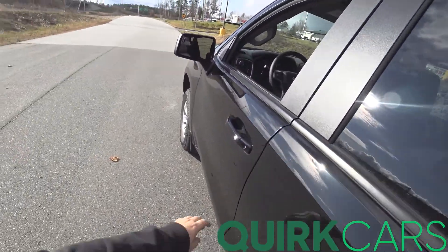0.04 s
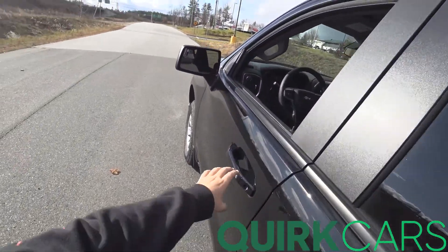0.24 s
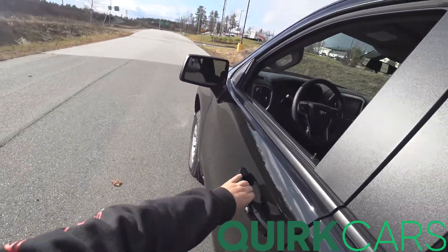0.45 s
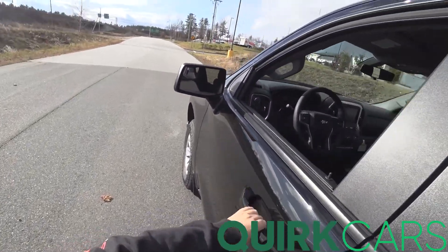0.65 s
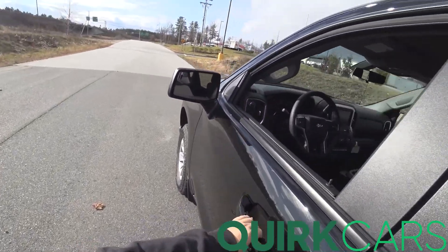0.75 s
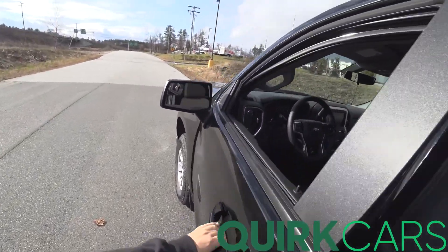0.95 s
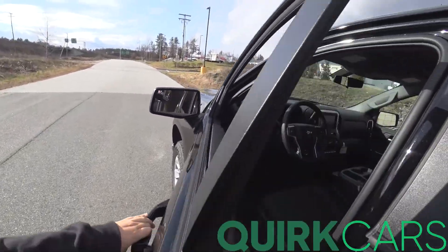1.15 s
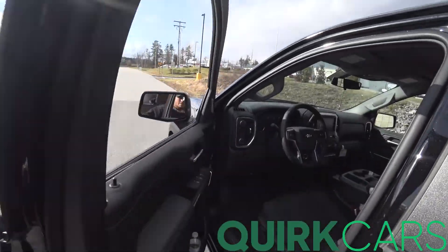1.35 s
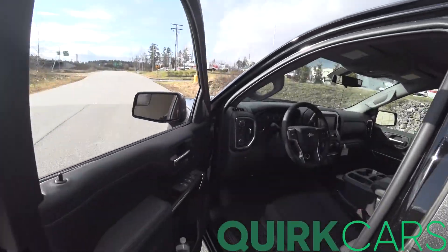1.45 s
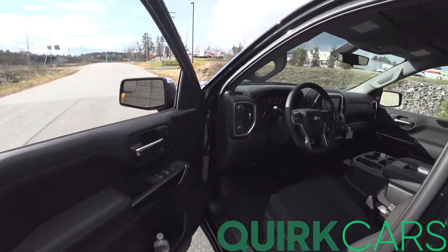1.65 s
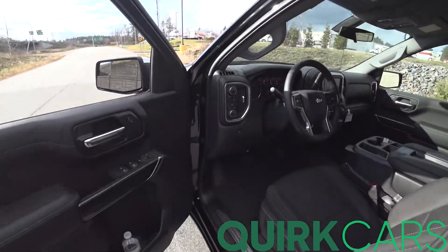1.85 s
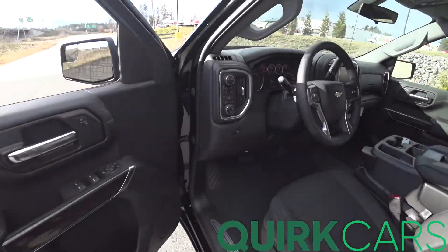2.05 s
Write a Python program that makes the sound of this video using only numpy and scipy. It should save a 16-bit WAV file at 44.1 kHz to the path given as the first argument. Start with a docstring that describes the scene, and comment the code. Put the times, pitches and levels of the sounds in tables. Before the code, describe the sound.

Vehicle door handle clunks and latch snaps open outdoors, hinge knocks, then heavy wind rumble

```python
"""On an open road, a pickup's door is opened close to a hand-held camera.
A sleeve rustles (coloured noise), the handle thuds on its stop and the latch snaps (ringing metal and noise bursts).
The door swishes out, and its hinge stay scrapes and knocks. Wind rumbles on the microphone and buffets its
two ports (noise and short pressure swings), hard once the door is open. Air, hiss and a low hum lie under it all."""
import sys
import numpy as np
from scipy import signal
from scipy.fft import rfft, irfft, next_fast_len
from scipy.io import wavfile
from scipy.ndimage import map_coordinates

SR = 44100
rng = np.random.default_rng(int(sys.argv[2]) if len(sys.argv) > 2 else 0)


def generate_wav(sig):
    """Save sig (samples, or channels by samples) to the path in sys.argv[1] as 16-bit PCM at SR."""
    pcm = np.round(np.clip(np.atleast_2d(sig).T, -1, 1) * 32767).astype(np.int16)
    wavfile.write(sys.argv[1], SR, pcm)


N = 92477  # length in samples, about 2.1 s

# Slow wind pressure on the ports: time_s, level_db
RUMBLE_LEVEL = [(0, -19), (.05, -45), (.08, -26.5), (.15, -40.5), (.2, -29.5), (.245, -40.5), (.3, -31),
                (.46, -37), (.74, -40), (.81, -27.5), (.92, -39), (1.4, -33.5), (1.47, -22), (1.53, -32.5),
                (1.61, -19), (1.69, -24), (2.09, -24.5)]
# Its tone: pitch_hz, level_db
RUMBLE_COLOUR = [(12, -28), (28, 2), (60, -6.5), (100, -9), (200, -17.5), (500, -78), (1500, -90)]
# Turbulence between the ports: time_s, level_db
BUFFET_LEVEL = [(0, -24.5), (.05, -41), (.085, -23), (.12, -45), (.29, -40), (.42, -50), (1.0, -76),
                (1.43, -42), (1.455, -24), (1.49, -27.5), (1.58, -27), (1.73, -22.5), (1.8, -26.5),
                (1.88, -28), (1.925, -24), (1.95, -33), (1.975, -20), (2.02, -24), (2.09, -26)]
# Tone of the part that pushes the ports opposite ways: pitch_hz, level_db
OPPOSED_COLOUR = [(25, -39), (60, 1), (115, 13), (200, 4), (400, -4), (600, -15), (1300, -29), (2400, -36),
                  (6000, -84)]
# Tone of the part both ports share: pitch_hz, level_db
SHARED_COLOUR = [(25, 5), (60, -9), (120, -0.5), (200, -3.5), (300, -7), (420, -16.5), (900, -32),
                 (2400, -36), (6000, -96)]
RUMBLE_SIDE_DB, BUFFET_MID_DB = -11.5, -6.5

# Rush of outdoor air, before a 1 dB lift and random wavering: time_s, level_db
AIR_LEVEL = [(0.0, -40.5), (0.33, -43), (0.71, -37.5), (0.95, -39.5), (1.41, -38.5), (1.62, -37.5),
             (2.09, -40)]
# Its tone: pitch_hz, level_db
AIR_COLOUR = [(40, -5), (150, -1.5), (290, -4), (420, -6.5), (620, -5.5), (860, -6), (1250, -15),
              (1500, -13.5), (1780, -11), (2020, -22.5), (2500, -31), (3500, -27), (8000, -99)]
# Fine hiss, before a 6.5 dB lift: time_s, level_db
HISS_LEVEL = [(0.0, -54), (0.22, -58.5), (0.81, -57.5), (1.27, -55), (1.47, -50), (1.61, -51.5),
              (1.74, -53), (2.09, -53)]
# Its tone: pitch_hz, level_db
HISS_COLOUR = [(1000, 7), (2500, 4), (4000, -2), (6000, 1.5), (8000, -2), (11000, -2.5), (13500, -6.5),
               (15500, -1)]
AIR_SIDE_DB, HISS_SIDE_DB = -13.5, -11
HUM_HZ, HUM_DB = 72.6, -43  # middle values; both waver a little

# Single eddies striking the ports:
# middle_s, length_s, opposed_level_db, opposed_pitch_hz, shared_level_db, shared_pitch_hz
EDDIES = [(0.076, 0.0055, -26, 150, -21, 105), (0.083, 0.0012, -6, 324, -12.5, 260),
          (0.0982, 0.0028, -11, 416, -19, 428), (.095, .005, -24, 222, -18.5, 182),
          (.296, 0.0019, -23, 250, -31, 181), (1.456, 0.0066, -15, 208, -18.5, 159),
          (1.468, .004, -17, 300, -23.5, 320), (1.526, 0.005, -19, 219, -29, 161),
          (1.554, 0.0029, -16, 328, -20.5, 228), (1.604, 0.0024, -12.5, 152, -12, 100),
          (1.616, 0.002, -6.5, 500, -16.5, 314), (1.642, 0.0029, -8.5, 241, -19, 159),
          (1.678, 0.0019, 0.5, 293, -14, 260), (1.708, 0.0048, -9, 169, -17.5, 150),
          (1.726, 0.0059, -9.5, 312, -14, 196), (1.74, 0.001, -13, 430, -16.5, 324),
          (1.758, 0.0025, -7, 210, -20, 139), (1.769, 0.0018, -5.5, 250, -17, 220),
          (1.811, 0.0026, -17, 310, -35, 150), (1.830, .005, -10, 198, -24, 151),
          (1.844, 0.0021, -4.5, 170, -16.5, 183), (1.8576, 0.0033, -4, 426, -10.5, 187.4),
          (1.871, 0.0051, -11.5, 480, -19.5, 313), (1.886, 0.0032, -2, 208, -17.5, 179),
          (1.897, 0.0018, -12, 470, -21.5, 298), (1.91, 0.0007, -5, 450, -18, 333),
          (1.9203, 0.00098, -5, 456, -15, 261), (1.93, 0.0045, -5.5, 143, -20, 106),
          (1.969, 0.004, -15, 260, -33, 164), (1.997, 0.0013, -11, 230, -32, 160),
          (2.061, .0015, -11, 413, -20.5, 306), (2.071, .008, -19, 272, -23.5, 131)]
# Tone of an eddy's fraying: multiple_of_pitch, level_db
FRAY_COLOUR = [(.2, 0.5), (.6, 6), (1, -3.5), (1.7, 2), (3, -20.5), (6, -43), (20, -70)]
EDDY_FRAY_DB = -5.5
EDDY_GLIDE = 0.14  # typical random pitch shift at the ends of an eddy, as a share of its pitch

# Some eddies pop on the microphone: start_s, level_db
POPS = [(.0815, -27), (.0965, -39), (1.613, -26), (1.6765, -15), (1.8588, -16), (1.9075, -27),
        (1.92, -23.5), (2.059, -35)]
# Tone of their dull crack: pitch_hz, level_db
POP_COLOUR = [(300, 4.5), (900, -2), (1400, -1), (2200, -12), (4800, -26.5), (6500, -27), (15000, -48)]
POP_HZ, POP_T60_S, POP_PUSH_DB = 800, 0.0071, 5.5  # push level is added to each pop's own

# Sleeve strokes of the reaching arm, before random wavering: time_s, level_db
SLEEVE_LEVEL = [(.1, -60), (.18, -43.5), (.33, -42.5), (.48, -40), (.54, -49.5), (.66, -62), (.73, -42),
                (.8, -46), (.86, -60)]
# Tone of the strokes: pitch_hz, level_db
SLEEVE_COLOUR = [(300, -8), (1300, 6.5), (2500, -5.5), (4000, -10.5), (6800, -13), (8200, -23),
                 (15000, -37)]
# Soft swish of arm and door swinging out, before random wavering: time_s, level_db
SWING_LEVEL = [(.88, -55), (.97, -44.5), (1.13, -41), (1.27, -45), (1.34, -70), (1.4, -70)]
# Tone of the swish: pitch_hz, level_db
SWING_COLOUR = [(400, -28), (850, 4), (1100, -3), (1500, -2.5), (1900, -16), (2350, -4), (3000, -19),
                (8000, -33)]

# The handle meeting its stop: start_s, level_db
THUDS = [(0.7714, -13.5), (0.7852, -21), (.801, -20), (.83, -31), (.846, -29), (.864, -32.5)]
# Ringing tones of the door skin: pitch_hz, level_db, decay_by_60_db_s
PANEL_MODES = [(72.5, -12, 0.25), (122, -1, .1), (196, -5, 0.067), (274, 4.5, 0.054), (358, -5, 0.1),
               (488, -7, 0.062)]
THUD_ATTACK_S = 0.00098
LATCH_S, LATCH_DB = 0.7970, -12.5  # the latch lets go
# Ringing tones of the latch: pitch_hz, level_db, decay_by_60_db_s
LATCH_MODES = [(370, -3, 0.021), (480, 3.5, 0.034), (610, -9, 0.028), (792, -11.5, 0.074), (900, -8, 0.044),
               (1065, -8.5, 0.031), (1880, -14.5, 0.032), (2120, -12.5, 0.033), (3530, -16.5, 0.034),
               (4850, -29, 0.038), (8420, -19.5, 0.021)]
# Tone of the latch's snap: pitch_hz, level_db
SNAP_COLOUR = [(300, 4), (1000, 7), (1400, -5), (2000, 0), (4500, 1), (7000, -5.5), (10500, -2.5),
               (13000, -13), (16000, -20)]
RELEASE_DB, RELEASE_HZ, RELEASE_T60_S = -9.5, 452, 0.0069  # the seal shoves the freed door out
PAWL_S, PAWL_DB = 0.8239, -39  # the pawl springs back with a brief steel ring
# Ringing tones of the pawl: pitch_hz, level_db, decay_by_60_db_s
PAWL_MODES = [(3560, -3, 0.032), (3900, -4, .035), (4430, -4, .04), (4910, -1, .055), (5490, -7, 0.038),
              (5870, 0, 0.039)]
# Small clicks of the handle and linkage: start_s, level_db
TICKS = [(0.574, -35), (.587, -32.5), (.8239, -20.5), (.85, -32), (.8962, -29)]
# Tone of the clicks: pitch_hz, level_db
TICK_COLOUR = [(1000, 8), (2800, -4), (3800, 2), (5500, 4), (7500, -1.5), (11000, -2), (15500, -15)]

# The hinge stay scraping up to and past its notch: start_s, level_db
SCRAPES = [(1.372, -32), (1.3882, -23), (1.3928, -18.5), (1.3985, -26)]
# Tone of the scrapes: pitch_hz, level_db
SCRAPE_COLOUR = [(150, 4.5), (550, 14), (900, 9), (1300, 0.5), (2500, 0), (3600, -6), (6500, -10.5),
                 (10500, -17), (14000, -24)]
SCRAPE_T60_S, SCRAPE_GRIT_DB = 0.036, 2.5
NOTCH_S, NOTCH_DB = 1.3935, -11.5  # the stay drops over the notch and knocks the door
# Ringing tones of that knock: pitch_hz, level_db, decay_by_60_db_s
STAY_MODES = [(345, -12, 0.087), (463, 1.5, 0.058), (583, -2.5, 0.047), (652, -4, 0.039), (797, -12, 0.034),
              (907, -11, 0.062), (1070, -9, 0.06), (1580, -29, 0.068), (1810, -16, .06), (2310, -21, 0.044),
              (2530, -16, 0.05)]

# Tone of the reflections: pitch_hz, level_db
REFLECTION_COLOUR = [(100, 3.5), (600, 4), (1200, 0.5), (2500, 0.5), (4500, 1), (15000, 2)]
DOOR_WET_DB, DOOR_T60_S = -11.5, 0.06
LATCH_LEFT_DB, STAY_LEFT_DB, SLEEVE_LEFT_DB = -0.5, 1.6, 1.24  # below zero leans right
CLIP_TOP, TOP_HZ = 1.1, 16000  # ceiling of the overload (full scale is 1), band limit


def amp(db):
    """Turn decibels into a gain."""
    return 10 ** (np.asarray(db) / 20)


def unit(x):
    """Scale to an average (rms) strength of 1."""
    return x / np.sqrt(np.mean(x ** 2) + 1e-20)


def curve(rows):
    """Join (time, value) points with straight lines, one value per sample."""
    return np.interp(np.arange(N) / SR, *np.transpose(rows))


def wobble(rate):
    """Draw a smooth random curve through this many random points a second."""
    points = rng.standard_normal(int(N * rate / SR) + 4)
    return map_coordinates(points, [np.arange(N) * rate / SR])


def gain(points, hz):
    """Read a gain off (pitch, level) points, spaced by ratio of pitch as the ear hears it."""
    pitch_hz, level_db = np.transpose(points)
    return amp(np.interp(np.log(hz + 1), np.log(pitch_hz + 1), level_db))


def noise(colour, size=N):
    """Shape random noise to a tone colour, at rms 1."""
    padded = next_fast_len(size + 2048)
    spectrum = rfft(rng.standard_normal(padded))
    spectrum = spectrum * gain(colour, np.fft.rfftfreq(padded, 1 / SR))
    return unit(irfft(spectrum, padded)[:size])


def stereo(mid, side):
    """Build left and right from a shared part and an opposed part."""
    return np.array([mid + side, mid - side])


def rush(colour, side_db):
    """Make stereo noise; a stronger opposed part sounds wider."""
    return stereo(noise(colour), amp(side_db) * noise(colour))


def place(x, left_db):
    """Lean a sound left by raising the left side and lowering the right equally."""
    return x * amp([[left_db], [-left_db]])


def add(track, s, sound):
    """Mix a sound into the track at a time in seconds."""
    first = max(round(s * SR), 0)
    track[..., first:first + sound.shape[-1]] += sound[..., :max(N - first, 0)]


def fade(t, t60):
    """Die away smoothly, dropping 60 dB in t60 seconds."""
    return np.exp(-np.log(1000) * t / t60)


def ring(modes, attack_s, hard=True):
    """Ring fading tones from one blow: in step if hard, alternately opposed if soft."""
    t = np.arange(SR // 4) / SR
    sign = 1 if hard else -1
    tones = np.zeros(len(t))
    for k, (hz, db, t60) in enumerate(modes):
        strength = amp(db + rng.normal(0, 1))  # each blow excites the tones a little differently
        tones += strength * fade(t, t60) * np.sin(2 * np.pi * hz * t) * sign ** k
    return tones * (1 - np.exp(-t / attack_s))


def crack(colour, t60, tail_db, tail_t60):
    """Make a hard contact: a short noise burst with a weaker, longer rattle."""
    size = 8192
    t = np.arange(size) / SR
    envelope = fade(t, t60) + amp(tail_db) * fade(t, tail_t60)
    burst = rng.standard_normal(size) * envelope
    # Fold the log spectrum into a filter that never sounds before the blow
    shape = unit(gain(colour, np.fft.rfftfreq(size, 1 / SR)))
    cepstrum = irfft(np.log(shape))
    causal = np.r_[cepstrum[0], 2 * cepstrum[1:size // 2]]
    return irfft(rfft(burst) * np.exp(rfft(causal, size)))


def wind():
    """Slow pressure rumbles in both ports; lumpy turbulence pushes them mostly opposite ways."""
    rumble = amp(curve(RUMBLE_LEVEL)) * rush(RUMBLE_COLOUR, RUMBLE_SIDE_DB)
    lumps = unit(amp(3.2 * wobble(55)))
    buffet = stereo(amp(BUFFET_MID_DB) * noise(SHARED_COLOUR), noise(OPPOSED_COLOUR))
    return rumble + amp(curve(BUFFET_LEVEL)) * lumps * buffet


def outdoors():
    """Moving air makes a broad rush and fine hiss, over a low wavering hum."""
    air_db = curve(AIR_LEVEL) + 1.0 + 1.5 * wobble(11.72)
    air = amp(air_db) * rush(AIR_COLOUR, AIR_SIDE_DB)
    hiss = amp(curve(HISS_LEVEL) + 6.5) * rush(HISS_COLOUR, HISS_SIDE_DB)
    hum_gain = amp(HUM_DB + 0.74 * wobble(7.3)) * np.sqrt(2)  # a sine's peak is root 2 times its rms
    hum_phase = 2 * np.pi * HUM_HZ * np.arange(N) / SR + 0.15 * wobble(5.9)
    return air + hiss + hum_gain * np.sin(hum_phase)


def swirl(t, hz, length):
    """One pressure swing speeds up or slows down and frays into turbulence."""
    fray = noise([(hz * multiple, db) for multiple, db in FRAY_COLOUR], size=len(t))
    bend = EDDY_GLIDE * rng.normal() * length * np.log(np.cosh(t / length))
    swing = np.sin(2 * np.pi * (hz * (t + bend) + rng.random()))
    return swing + amp(EDDY_FRAY_DB) * fray


def eddies():
    """Each eddy briefly swings the pressure, partly between the ports and partly in both."""
    out = np.zeros((2, N))
    t = np.arange(-SR // 20, SR // 20) / SR
    for s, length, opposed_db, opposed_hz, shared_db, shared_hz in EDDIES:
        shared = amp(shared_db) * swirl(t, shared_hz, length)
        opposed = amp(opposed_db) * swirl(t, opposed_hz, length)
        swell = 1 / np.cosh(t / length)
        add(out, s + t[0], stereo(shared, opposed) * swell)
    return out


def pops():
    """Some eddies give a sudden push of air and a short dull crack."""
    out = np.zeros(N)
    for s, db in POPS:
        add(out, s, amp(db) * ring([(POP_HZ, POP_PUSH_DB, POP_T60_S)], attack_s=0.00033))
        add(out, s, amp(db - 6.5) * crack(POP_COLOUR, POP_T60_S, tail_db=-19, tail_t60=0.054))
    return out


def sleeve():
    """Cloth rubs as the arm reaches for the handle, then swishes as the door swings out."""
    reach_db = curve(SLEEVE_LEVEL) + 0.93 * wobble(59.7)
    reach = amp(reach_db) * rush(SLEEVE_COLOUR, side_db=-10.0)
    swing_db = curve(SWING_LEVEL) + 2.2 * wobble(41.2)
    swing = amp(swing_db) * rush(SWING_COLOUR, side_db=-9)
    return place(reach + swing, SLEEVE_LEFT_DB)


def handle_and_latch():
    """The handle thuds into the door skin, the latch snaps, the seal shoves and the linkage ticks."""
    out = np.zeros(N)
    for s, db in THUDS:
        add(out, s, amp(db) * ring(PANEL_MODES, THUD_ATTACK_S, hard=False))
    add(out, LATCH_S, amp(LATCH_DB) * ring(LATCH_MODES, attack_s=0.00029))
    add(out, LATCH_S, ring([(RELEASE_HZ, RELEASE_DB, RELEASE_T60_S)], attack_s=0.00039))
    add(out, LATCH_S, amp(-16.5) * crack(SNAP_COLOUR, t60=0.0046, tail_db=-16, tail_t60=0.11))
    add(out, PAWL_S, amp(PAWL_DB) * ring(PAWL_MODES, attack_s=0.0001))
    for s, db in TICKS:
        add(out, s, amp(db) * crack(TICK_COLOUR, t60=0.0029, tail_db=-17.5, tail_t60=0.077))
    return out


def hinge_stay():
    """The stay scrapes grittily up to and past its notch, knocking the door as it drops over."""
    out = np.zeros(N)
    for s, db in SCRAPES:
        scrape = crack(SCRAPE_COLOUR, SCRAPE_T60_S, tail_db=-12, tail_t60=0.12)
        grit = unit(amp(SCRAPE_GRIT_DB * wobble(1570)))[:len(scrape)]  # fast random roughness
        add(out, s, amp(db) * scrape * grit)
    add(out, NOTCH_S, amp(NOTCH_DB) * ring(STAY_MODES, attack_s=0.00063))
    return out


def reflections(x):
    """The truck's side and the road answer with a brief fading tail, different at each port."""
    t = np.arange(SR // 5) / SR
    tail = np.array([noise(REFLECTION_COLOUR, size=len(t)) for _ in range(2)])
    tail = tail * fade(t, DOOR_T60_S)
    tail = tail / np.linalg.norm(tail[0])
    return signal.fftconvolve(x[None], tail, axes=1)[:, :N]


def scene():
    """Mix the door and sleeve with the wind and the outdoor air."""
    microphone_wind = wind() + eddies() + pops()
    latch, stay = handle_and_latch(), hinge_stay()
    door = place(latch, LATCH_LEFT_DB) + place(stay, STAY_LEFT_DB)
    door = door + amp(DOOR_WET_DB) * reflections(latch + stay)
    return microphone_wind + outdoors() + sleeve() + door


def record(dry):
    """The camera rounds off overloads smoothly and cuts steeply above its band limit."""
    clipped = dry / (1 + np.abs(dry / CLIP_TOP) ** 6) ** (1 / 6)
    steep = signal.ellip(12, 0.1, 90, TOP_HZ, fs=SR, output="sos")
    return signal.sosfiltfilt(steep, clipped)  # run both ways, so nothing is delayed


dry = scene()
out = record(dry)
generate_wav(out)
```